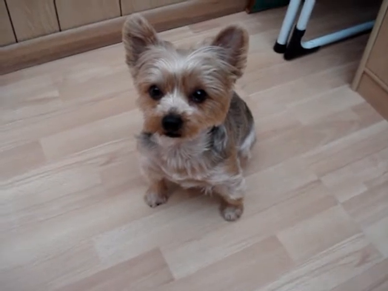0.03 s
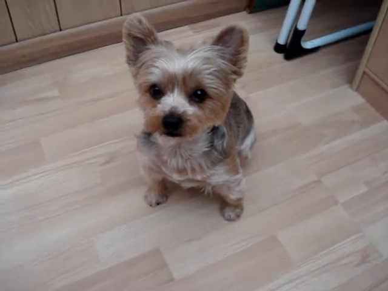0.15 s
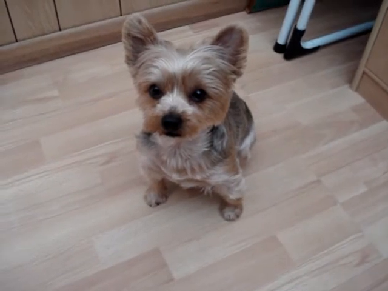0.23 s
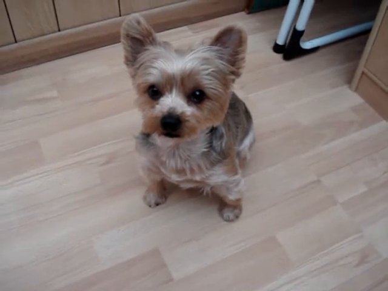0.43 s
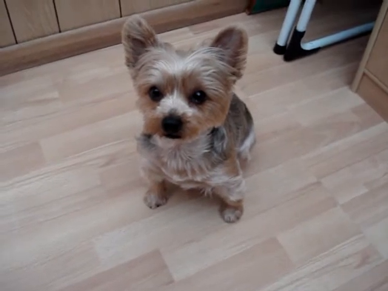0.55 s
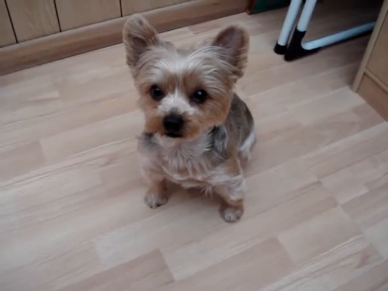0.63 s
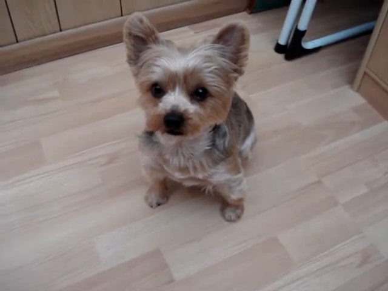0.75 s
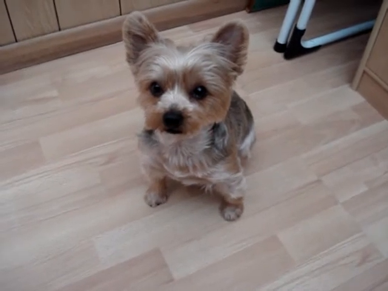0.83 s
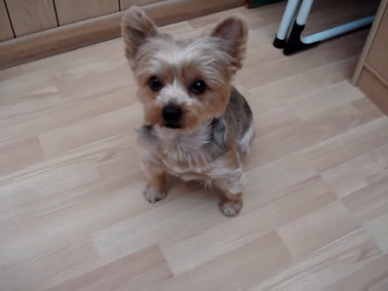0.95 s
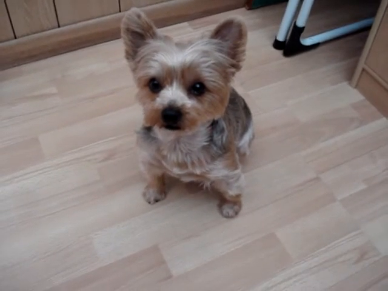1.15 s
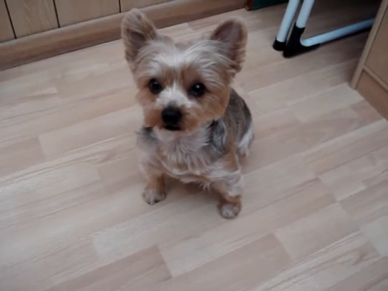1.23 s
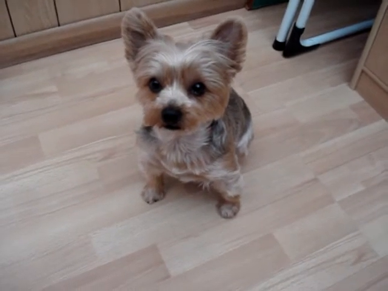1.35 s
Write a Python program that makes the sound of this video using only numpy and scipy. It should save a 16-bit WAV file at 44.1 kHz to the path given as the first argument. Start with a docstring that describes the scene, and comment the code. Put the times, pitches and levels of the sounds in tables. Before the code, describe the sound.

One short, closed-mouth grumble from a small dog indoors, over faint room hiss.

```python
"""A small dog grumbles

In a quiet room, a small dog gives one low grumble with its mouth closed. Its slack vocal folds beat
unevenly, in quick surges, and make the throat ring. The voice drops, turns to a creak and ends in a
thin hiss through the nose. Around it are room hiss, a faint high whine and a few soft shuffles."""
import sys
import numpy as np
from scipy import signal
from scipy.fft import rfft, irfft
from scipy.io import wavfile
from scipy.ndimage import uniform_filter1d

SR = 44100
rng = np.random.default_rng(int(sys.argv[2]) if len(sys.argv) > 2 else 0)


def dump_mix(stems):
    """Bounce the given channels to the path in sys.argv[1] as a 16-bit WAV at rate SR."""
    frames = np.atleast_2d(stems).T  # one column per channel
    limited = np.clip(frames, -1, 1)  # hard clip at full scale
    pcm = np.round(limited * 32767).astype(np.int16)
    wavfile.write(sys.argv[1], SR, pcm)


N = 61739
TIME = np.arange(N) / SR

# Tone of the room hiss, from low to high: frequency_hz, relative_db
HISS_COLOUR = [(25, -20), (70, -9), (150, -4), (330, 2.5), (650, 1.5), (1000, 0), (1800, -2.5),
               (3600, -4.5), (5500, -7), (7500, -9), (8200, -5.5), (8900, -10), (10000, -11.5)]
# Dull tone of the shuffles: frequency_hz, relative_db
SHUFFLE_COLOUR = [(60, -25), (170, -12), (350, -4), (600, 4.5), (1200, -12), (4000, -11.5), (10000, -27)]
# Soft shuffles: start_s, decay_s, gain_db
SHUFFLES = [(.985, 0.023, -55), (1.19, 0.055, -63), (1.288, 0.012, -49.5)]
# Puffs of air through the nose: middle_s, half_length_s, centre_hz, width_hz, level_db
NOSE_PUFFS = [(0.338, 0.011, 7770, 605, -66), (0.447, 0.045, 9300, 1460, -68.5),
              (0.557, 0.0086, 8700, 910, -59.5), (0.568, 0.0095, 9580, 676, -62)]
# How fast the vocal folds beat: time_s, pitch_hz
FOLD_PITCH = [(.201, 331.7), (.222, 305), (.243, 212), (.262, 193.2), (.285, 162), (.33, 197.7),
              (.37, 204.5), (.425, 203.7), (.47, 179), (.52, 163.2), (.545, 181.8), (.6, 167)]
# How hard the dog pushes its voice: time_s, relative_db
VOICE_EFFORT = [(.198, -18), (.206, -3.5), (.235, 3), (.3, 1), (.37, -2), (.43, -2), (.49, -3.5),
                (.53, -6.5), (.562, -16), (.595, -24.5)]
# Surges of the voice, each followed by a short slack: middle_s, boost_db
VOICE_SURGES = [(.219, 7), (.249, 7), (.294, 9), (.336, 10), (.372, 10), (.415, 4), (.483, 5)]
# Ringing notes of the throat and muzzle: centre_hz, width_hz, relative_db, surge_share (0 to 1)
THROAT_RINGS = [(328, 39, -9.5, 0.03), (462, 160, -11, 0.1), (553.5, 155, -3.5, 0.55),
                (615.1, 69, 1.5, 0.71), (1028, 177, -12.5, 0.17)]
# Hum of the chest, before its dips and wavers: time_s, level_db
CHEST_HUM = [(.2, -79), (.232, -73.5), (.252, -50.5), (.3, -61), (.36, -51.5), (.41, -55), (.47, -59.5),
             (.515, -56), (.535, -83), (.58, -91)]


def undb(db):
    """Turn decibels into a number to multiply by."""
    return 10 ** (np.asarray(db) / 20)


def unit(x):
    """Scale a sound to an average strength (rms) of 1."""
    return x / np.sqrt(np.mean(x ** 2))


def curve(table):
    """Join (time_s, value) rows with straight lines."""
    return np.interp(TIME, *np.array(table).T)


def bump(middle_s, half_length_s):
    """A smooth swell of height 1."""
    return np.exp(-.5 * ((TIME - middle_s) / half_length_s) ** 2)


def resonate(x, centre_hz, width_hz):
    """Make a sound ring around one pitch; filtering twice narrows the band."""
    b, a = signal.iirpeak(centre_hz, centre_hz / width_hz, fs=SR)
    return signal.lfilter(b, a, signal.lfilter(b, a, x))


def noise(colour):
    """Noise of strength 1, shaped by (frequency_hz, relative_db) rows."""
    hz, db = np.array(colour).T
    freqs = np.maximum(np.arange(N // 2 + 1) * SR / N, 1)
    gains = undb(np.interp(np.log(freqs), np.log(hz), db))
    return unit(irfft(rfft(rng.standard_normal(N)) * gains, N))


def drift(rate_hz):
    """A random wander of strength 1."""
    hold = int(SR / rate_hz)
    steps = np.repeat(rng.standard_normal(N // hold + 1), hold)
    return unit(uniform_filter1d(steps, hold)[:N])


def background(hiss_db=-59, whine_db=-77, whine_hz=8122):
    """Room hiss and a faint electrical whine, both wavering a little."""
    hiss = noise(HISS_COLOUR) * undb(hiss_db + .82 * drift(rate_hz=3.1))
    whine = np.sqrt(2) * np.sin(2 * np.pi * whine_hz * TIME)
    return hiss + whine * undb(whine_db + 1.5 * drift(rate_hz=20))


def shuffles(rise_s=.0039):
    """Dull little scuffs that rise quickly and die away."""
    level = 0
    for start_s, decay_s, db in SHUFFLES:
        age = np.maximum(TIME - start_s, 0)
        level += undb(db) * (1 - np.exp(-age / rise_s)) * np.exp(-age / decay_s)
    return level * noise(SHUFFLE_COLOUR)


def room(x, gap_s=.018, fade_s=.33, echo_db=-12):
    """Add the short echo of a furnished room with a hard floor."""
    tail = rng.standard_normal(N) * (TIME > gap_s) * undb(-60 * TIME / fade_s)
    return x + undb(echo_db) * signal.fftconvolve(x, tail / np.linalg.norm(tail))[:N]


def nose():
    """Air hisses through the nostrils in thin, high puffs."""
    return sum(undb(db) * bump(middle_s, half_s) * unit(resonate(rng.standard_normal(N), hz, width_hz))
               for middle_s, half_s, hz, width_hz, db in NOSE_PUFFS)


def vocal_folds(jitter_cycles=.07, shimmer_db=3):
    """The folds beat unevenly in time and strength. Gives their pulses and a running count of cycles."""
    start_s, end_s = FOLD_PITCH[0][0], FOLD_PITCH[-1][0]
    even_cycles = np.cumsum(curve(FOLD_PITCH) * (TIME > start_s)) / SR
    beats = np.arange(int(np.interp(end_s, TIME, even_cycles)))
    timing, strength = rng.standard_normal((N // 100, 2))[beats].T
    at = np.searchsorted(even_cycles, beats + .5 + jitter_cycles * timing)
    creak = curve([(.38, .25), (.46, .7)])  # time_s, share lost by every second pulse
    pulses = np.zeros(N)
    pulses[at] = undb(shimmer_db * strength) * (1 - creak[at] * (beats % 2))
    return pulses, np.interp(np.arange(N), at, beats)


def throat(pulses, cycles, surge_db, rasp_db=-17, voice_db=-45, band_hz=(69.6, 1650)):
    """Each pulse, with a short rasp of air, makes the throat and muzzle ring."""
    voiced = (cycles > 0) & (cycles < cycles[-1])
    rasp = voiced * np.exp(-(cycles % 1) / .13) * rng.standard_normal(N)
    buzz = (unit(pulses) + undb(rasp_db) * unit(rasp)) * undb(curve(VOICE_EFFORT))
    voice = sum(undb(db) * resonate(buzz * undb(share * surge_db), hz, width_hz)
                for hz, width_hz, db, share in THROAT_RINGS)
    voice = signal.sosfilt(signal.butter(2, band_hz, "band", fs=SR, output="sos"), voice)
    return voice * undb(voice_db) / np.std(voice[voiced])


def hums(cycles, slack_db, octave_db=-10, waver_db=3.5, closing_db=-55):
    """The chest hums at the voice's pitch and an octave above; a short hum on that octave closes."""
    octave = np.cos(2 * np.pi * 2 * cycles)
    tone = np.sin(2 * np.pi * cycles) + undb(octave_db) * octave
    roughness = 1 + .18 * np.sin(np.pi * cycles)  # strong and weak beats in turn
    chest_db = curve(CHEST_HUM) + .6 * slack_db + waver_db * drift(rate_hz=150)
    closing = octave * undb(closing_db) * bump(middle_s=.549, half_length_s=.008)
    return np.sqrt(2) * (tone * roughness * undb(chest_db) + closing)


def grumble(slack_delay_s=.0155, dip_db=-12):
    """The folds drive the throat and chest; the voice surges, then goes slack for a moment."""
    pulses, cycles = vocal_folds()
    slack_db = dip_db * sum(bump(at + slack_delay_s, half_length_s=.005) for at, _ in VOICE_SURGES)
    surge_db = slack_db + sum(db * bump(at, half_length_s=.004) for at, db in VOICE_SURGES)
    return throat(pulses, cycles, surge_db) + hums(cycles, slack_db)


def scene():
    """The dog in its room, with the shuffles and background, in one channel."""
    return (room(grumble() + nose()) + shuffles() + background())[None]


def record(dry):
    """Cut off the very highest treble."""
    top_hz = 10000
    return signal.sosfilt(signal.ellip(10, .2, 60, top_hz, fs=SR, output="sos"), dry)


dry = scene()
out = record(dry)
dump_mix(out)
```